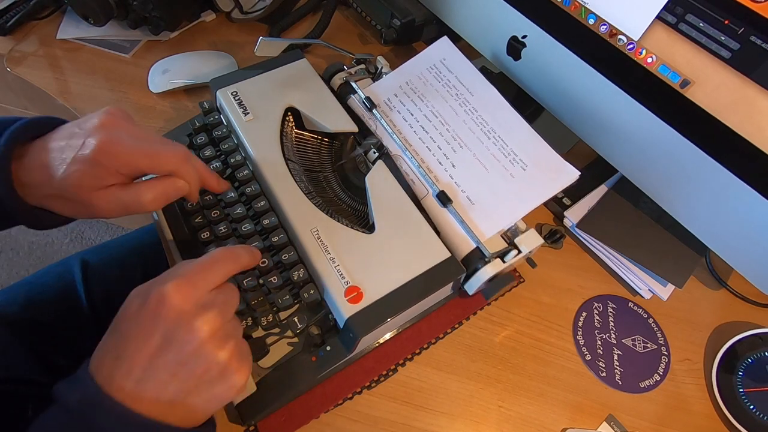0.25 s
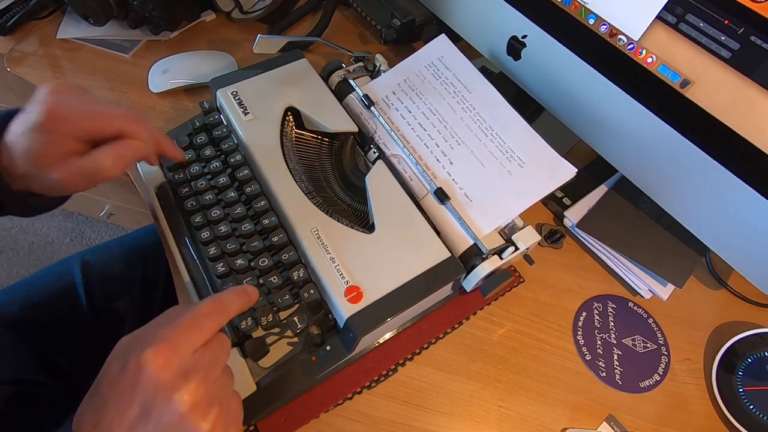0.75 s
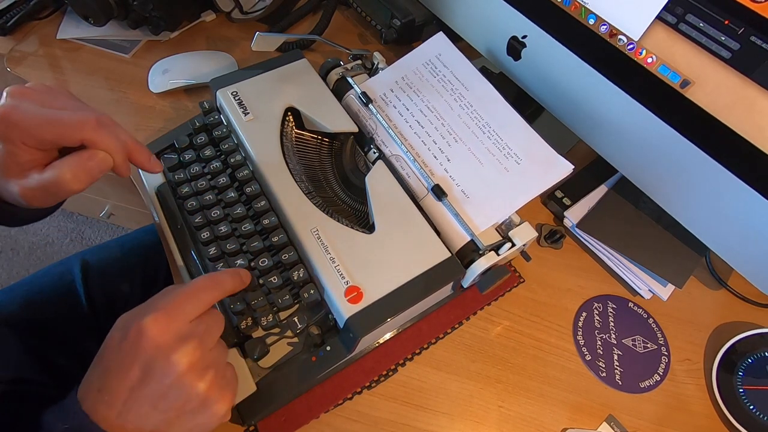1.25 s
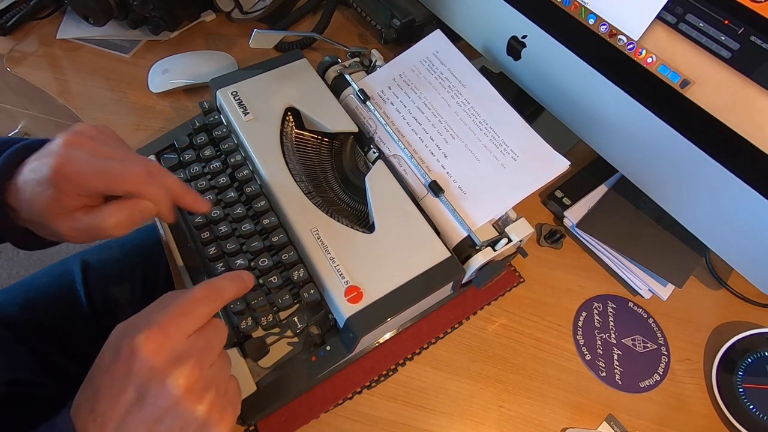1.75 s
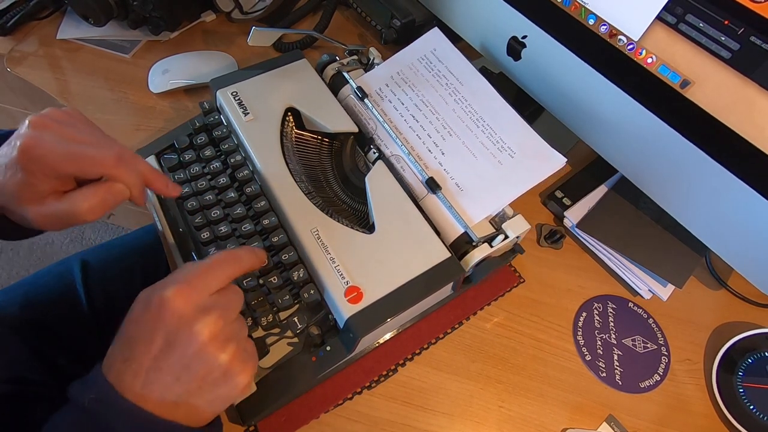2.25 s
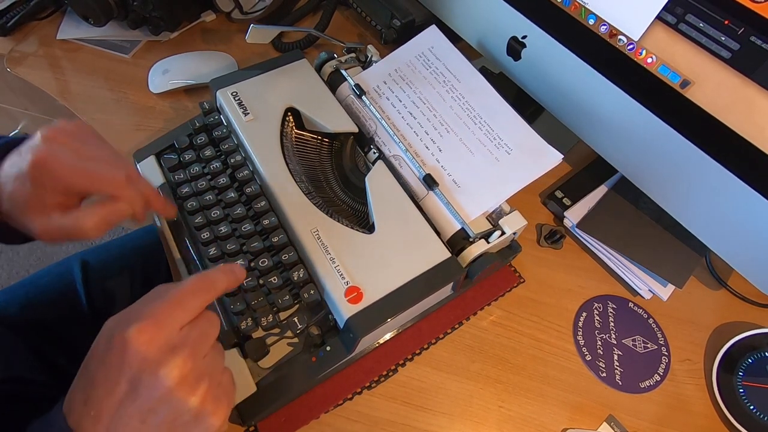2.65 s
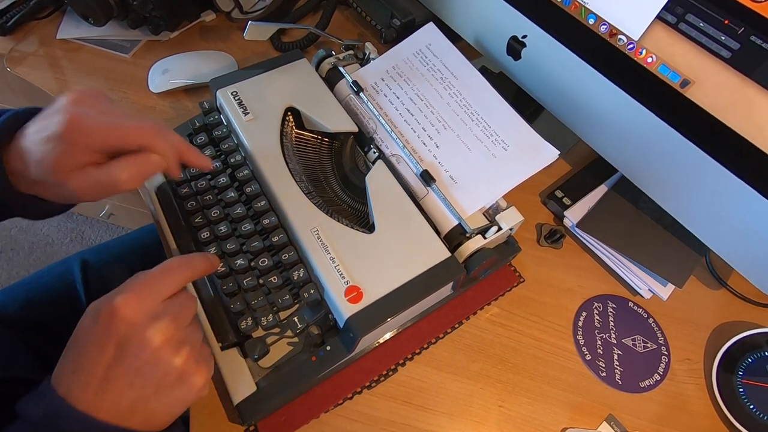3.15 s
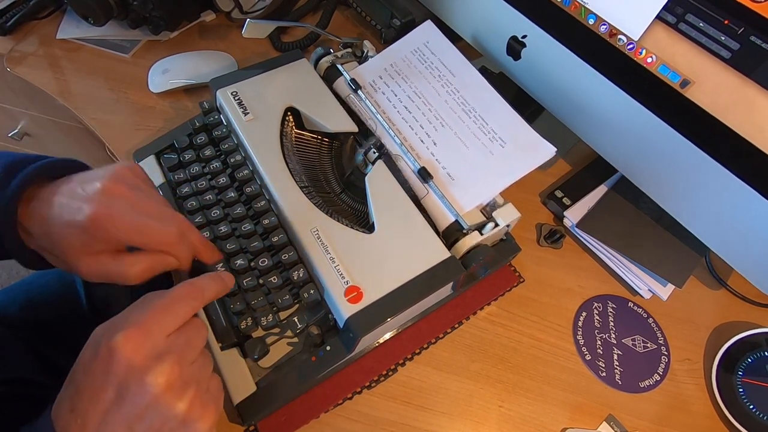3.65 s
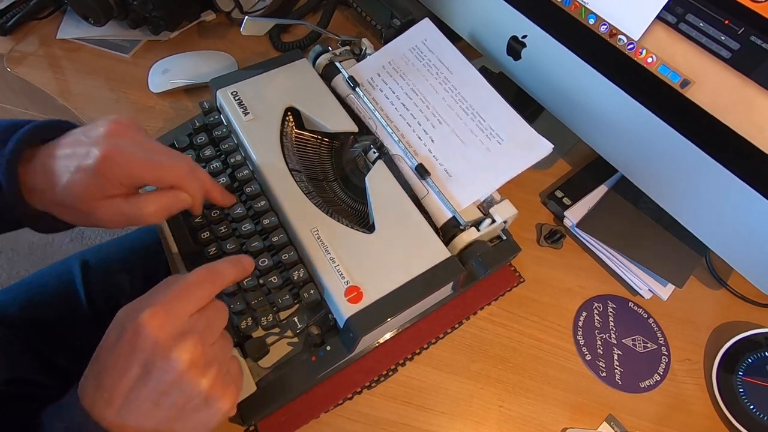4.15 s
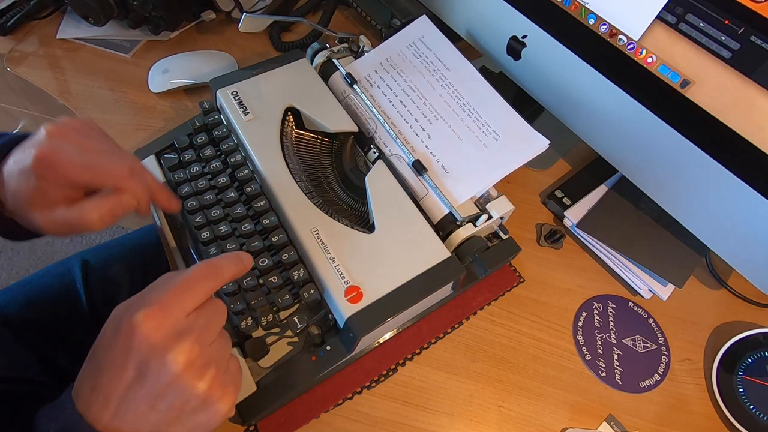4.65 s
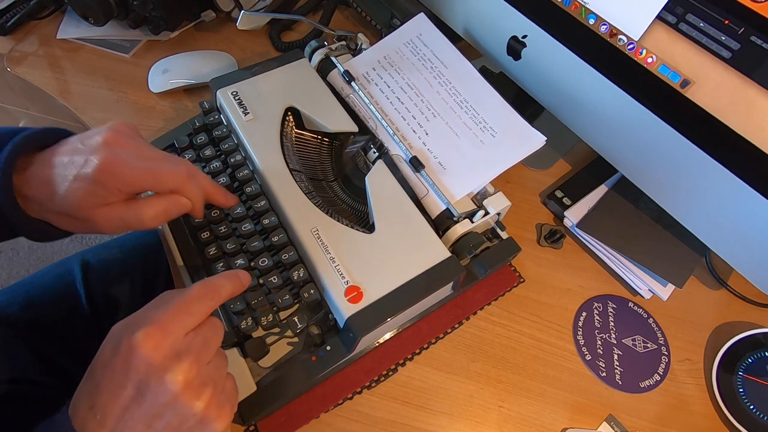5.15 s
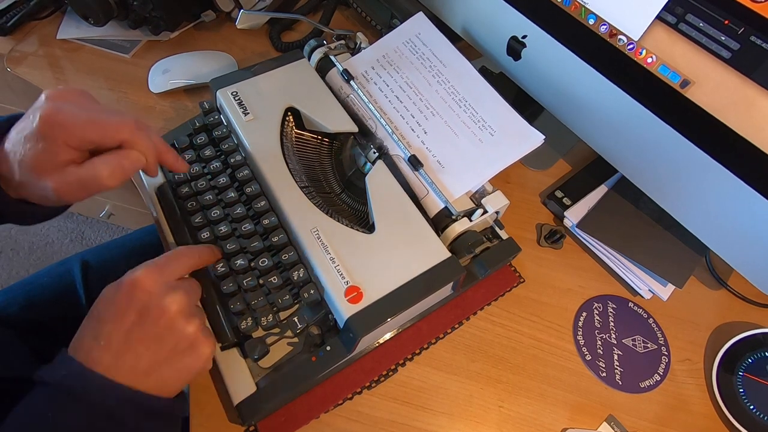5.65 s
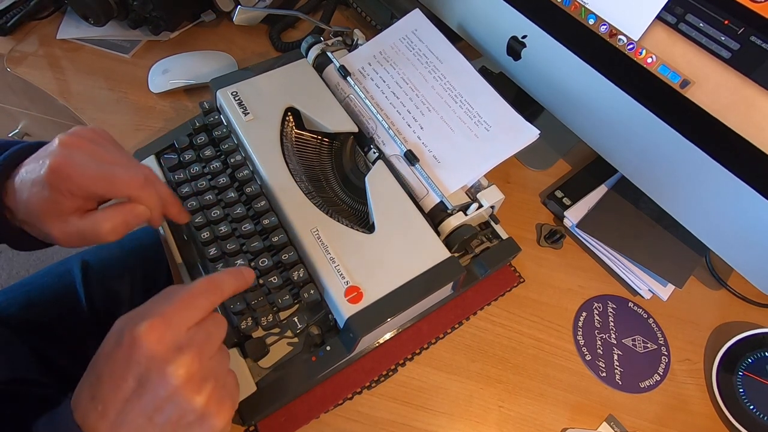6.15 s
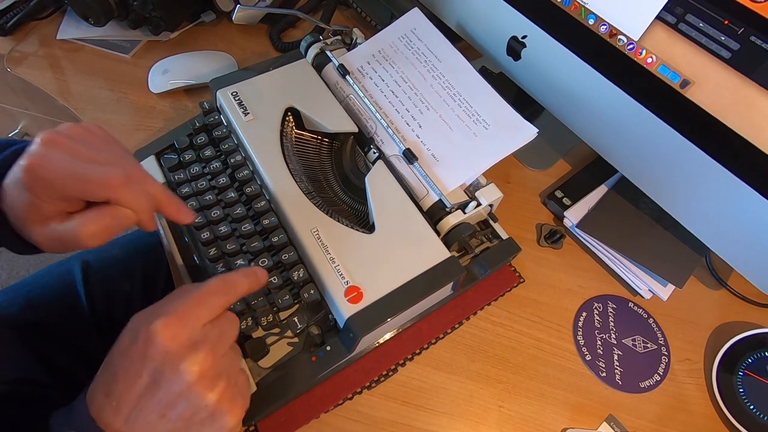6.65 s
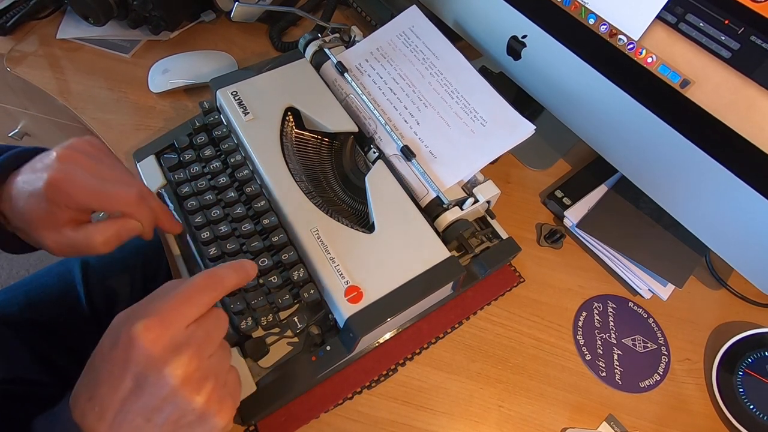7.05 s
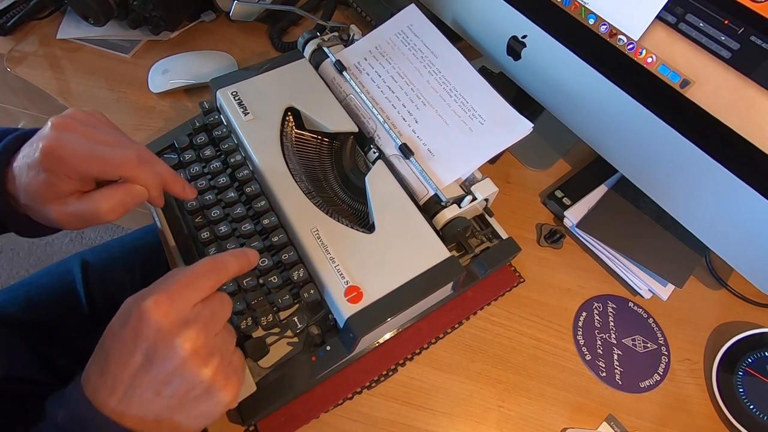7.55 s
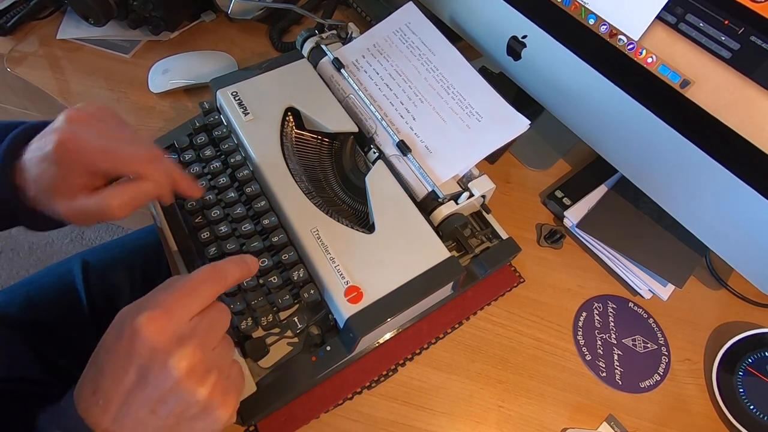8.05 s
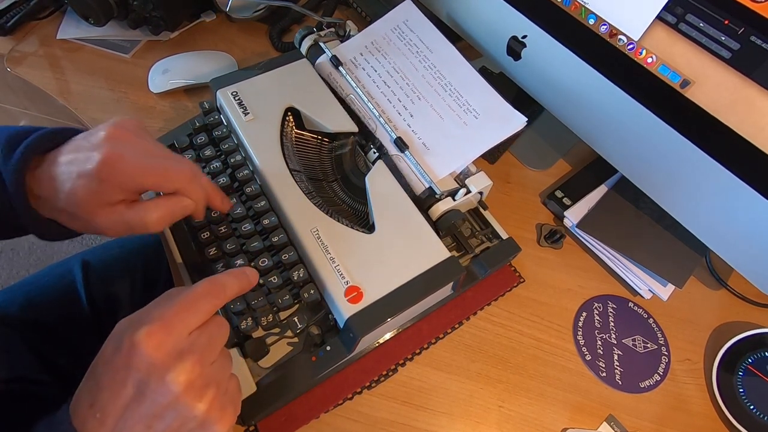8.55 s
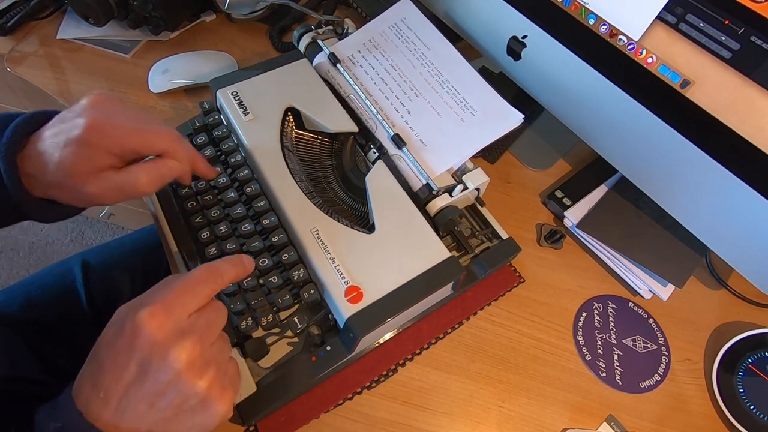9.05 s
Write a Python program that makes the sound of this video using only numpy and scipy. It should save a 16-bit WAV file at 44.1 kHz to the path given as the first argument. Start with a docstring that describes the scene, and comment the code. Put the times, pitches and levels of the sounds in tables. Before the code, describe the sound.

A portable manual typewriter is typed on with two fingers, close up and in stereo, in a small, quiet room with a faint low rumble. Each letter is a sharp clack of type against paper, wrapped in a quick linkage rattle, a carriage click and the typebar falling back. The steel frame rings briefly and the wooden desk thumps underneath. Three quick letters open, then the typing continues unevenly at about three or four strokes a second. Duller, hollow space bar thuds separate the runs at about 0.6, 1.7, 2.8, 4.0, 4.6, 6.1, 7.1 and 8.3 seconds. Key springs add thin, bright jangles now and then, clearest near 3.5, 6.0 and 7.6 seconds. Two letters around 6.5 and 6.9 seconds click with less slap, then firmer strikes return, with the last stroke at about 9.1 seconds.

```python
"""Over a faint room rumble, a key rattles and type slaps paper: two fingers on a portable manual typewriter,
close up and in stereo, on a wooden desk. For each letter the linkage rattles, the escapement trips,
the type slaps the platen, the carriage steps and the typebar falls back. The space bar thuds and steps
the carriage without a slap. Every stroke rings the steel frame and thumps the desk."""
import sys
import numpy as np
from scipy import signal
from scipy.fft import rfft, irfft
from scipy.io import wavfile

SR = 44100
rng = np.random.default_rng(int(sys.argv[2]) if len(sys.argv) > 2 else 0)


def digitize_waveform(pressure):
    """Quantize a signal to 16-bit integers and store it at the path in sys.argv[1].

    Rows of a 2-D input are taken as channels; values are limited to [-1, 1].
    """
    field = np.atleast_2d(pressure).T
    bounded = np.clip(field, -1, 1)
    quanta = np.round(bounded * 32767).astype(np.int16)
    wavfile.write(sys.argv[1], SR, quanta)


N = 409688
TIME = np.arange(N) / SR


def undb(db):
    """Decibels to gain."""
    return 10 ** (np.asarray(db) / 20)


def unit(x):
    """Scale a response to unit energy in each channel."""
    return x / np.sqrt(np.sum(x ** 2, axis=-1, keepdims=True))


def fade(t, t60):
    """Exponential decay, 60 dB down after t60 seconds."""
    return undb(-60 * t / t60)


def add(track, at, sound):
    """Mix a sound into a track at a time in seconds."""
    start = int(round(at * SR))
    a, b = max(start, 0), min(start + sound.shape[-1], N)
    if b > a:
        track[..., a:b] += sound[..., a - start:b - start]


def convolve(x, response):
    """Pass a track through an impulse response."""
    return signal.oaconvolve(np.atleast_2d(x), response, axes=-1)[:, :x.shape[-1]]


def colour(x, points, size=4096):
    """Minimum-phase EQ through (Hz, dB) points."""
    hz, db = np.transpose(points)
    bin_hz = np.arange(size // 2 + 1) * SR / size
    gain = undb(np.interp(np.log(bin_hz + 1), np.log(hz), db))
    cepstrum = irfft(np.log(gain))
    cepstrum[1:size // 2] *= 2
    cepstrum[size // 2 + 1:] = 0
    return convolve(x, irfft(np.exp(rfft(cepstrum)))[None])


def ears(mid_side, side_db, split_hz):
    """Left and right from mid and side: narrow in the bass, wide above split_hz."""
    mid, side = mid_side
    treble = signal.sosfilt(signal.butter(2, split_hz, "high", fs=SR, output="sos"), side)
    side = treble + undb(side_db) * np.roll(side - treble, SR // 1000)
    return np.array([mid + side, mid - side])


def stereo_noise(seconds, side_db, split_hz):
    """Broadband noise that widens above split_hz."""
    return ears(rng.standard_normal((2, int(seconds * SR))), side_db, split_hz)


# EQ of the quiet room. Each row: frequency in Hz, gain in dB.
ROOM_TONE_EQ = [(20, -19.5), (50, -8), (90, -2.5), (130, -5), (200, -28), (400, -28), (1000, -25.5),
                (3000, -33), (9000, -53), (11500, -75.5)]


def room_tone(db=-57):
    """A steady bed of low rumble with a trace of hiss."""
    air = colour(stereo_noise(N / SR + 1, -2.5, 3000)[:, :N], ROOM_TONE_EQ)
    return undb(db) * air / air.std()


def chatter(db, rise, t60, per_s=9000, spread_db=3):
    """A part lands and chatters: a mid/side swarm of tiny impacts that swells and dies away."""
    t = TIME[:int((rise + t60) * SR)]
    hits = rng.random(SR // 2)[:len(t)] < per_s / SR
    force = rng.standard_normal((2, SR // 2))[:, :len(t)]
    impacts = hits * np.sign(force) * undb(spread_db * np.abs(force))
    envelope = np.minimum(t / rise, 1) * fade(np.maximum(t - rise, 0), t60)
    return undb(db) * impacts / impacts.std() * envelope


def knock(impacts, body_eq):
    """Impacts heard through the colour of the part that they shake."""
    return colour(ears(impacts, -20.5, 1000), body_eq)


def ring(modes, db, detune=.03, scatter_db=3.0, contact_s=0.00072, lag_s=.000015, size=1100):
    """One blow rings a part's modes, never twice quite alike; the left ear hears it later."""
    t = np.maximum(TIME[:size] - np.array([[lag_s], [0]]), 0)
    tone = 0
    for hz, t60, mode_db in modes:
        pitch, force = rng.standard_normal(2)
        gain = undb(db + mode_db + scatter_db * force)
        tone = tone + gain * np.sin(2 * np.pi * hz * (1 + detune * pitch) * t) * fade(t, t60)
    return tone * (1 - np.exp(-t / contact_s))


# Letter cues. Each row: strike time in seconds, platen slap trim in dB, typebar landing trim in dB.
LETTER_CUES = [(.045, -0.5, -0.5), (0.2352, 3.5, 4), (.3383, 2.5, -2), (.926, 3.5, 6), (1.2298, -2, -14),
               (1.429, 0.5, -1), (1.9478, -0.5, -8.5), (2.211, 0.5, -12.5), (2.41, -0.5, -3),
               (2.5674, -0.5, 0.5), (3.089, -3, -4.5), (3.327, 1, -0.5), (3.7282, -2, -0.5),
               (4.2487, -4, -2), (4.439, -3, 0), (4.9394, -10, 6), (5.24, -3, 2.5), (5.5451, 0, 2),
               (5.76, -6.5, -4), (5.9081, -10.5, 2.5), (6.5053, -22, -5.5), (6.8675, -35, -34),
               (7.447, -4.5, -2.5), (7.7762, -9, -3.5), (8.0102, -1.5, -0.5), (8.613, -0.5, 5),
               (8.8139, -2.5, -8), (9.1023, -19, -3.5)]
# The typebar's click in its guide, then the slug's smack on paper and platen.
# Each row: pitch in Hz, 60 dB decay in seconds, level in dB.
GUIDE_MODES = [(2930, 0.00095, -2), (5040, 0.00095, 7), (6550, 0.0026, -2.5)]
PLATEN_MODES = [(906, 0.002, -15), (1700, 0.00082, -22), (2390, 0.0065, 4.5), (3004, 0.0067, 1)]
# EQs of the dull carriage knock and the bright key springs. Each row: frequency in Hz, gain in dB.
CARRIAGE_EQ = [(150, -10.5), (280, -2.5), (380, -17.5), (470, -4.5), (560, -11.5), (770, 1.5), (1000, -5.5),
               (1500, -4.5), (3000, -20.5), (9000, -47)]
KEY_SPRING_EQ = [(100, -60.5), (5000, -31), (7800, -6.5), (8900, 0.5), (9500, 1), (10500, -29)]
# Key springs that jangle loudly as a lever settles. Each row: start in seconds, level before EQ in dB.
JANGLE_CUES = [(1.06, -39), (2.064, -36), (3.219, -38.5), (3.455, -28), (5.08, -35.5), (5.364, -38),
               (6.039, -31), (7.571, -30.5), (8.747, -33)]


def letters(travel_s=.037, step_s=.034, fall_s=.094):
    """Each key throws a typebar at the platen; clash and thump grow as the carriage moves along."""
    steel, dull, springs, rings = np.zeros((4, 2, N))
    pushes = np.zeros(N)
    for at, slap_db, land_db in LETTER_CUES:
        steps = sum(cue[0] < at for cue in LETTER_CUES) + sum(press < at for press in SPACE_CUES)
        clash_db = -3.5 + 0.066 * steps
        thump_db = 0.67 + 0.0862 * steps
        touch = at - travel_s - .002 * rng.standard_normal()
        land = at + fall_s + .004 * rng.standard_normal()
        stop = at + step_s + 0.0014 * rng.standard_normal()
        # The finger lands, the lever ticks through its slack, the linkage swings the typebar up.
        add(pushes, touch, undb([-40 + thump_db]))
        add(steel, touch, chatter(-41, .001, 0.045, per_s=3000))
        add(steel, touch - .002, chatter(-31, 0.023, 0.14, per_s=3300, spread_db=-1))
        add(dull, at - .024, chatter(-29, 0.036, 0.061))
        # The escapement trips and the ribbon lifts.
        add(steel, at - .008, chatter(-15.5 + clash_db, 0.005, 0.022))
        # The typebar clashes in its guide, slaps the platen and rebounds.
        guide, platen = at - .00105, at - .00045
        add(steel, guide, chatter(-10.5 + clash_db, 0.000067, 0.029))
        add(rings, guide, ring(GUIDE_MODES, -.5 + clash_db, scatter_db=.8, lag_s=.00002))
        add(rings, platen, ring(PLATEN_MODES, -6.5 + slap_db, scatter_db=.8, lag_s=.000005))
        add(steel, at + 0.00086, chatter(-14 + clash_db, 0.00012, 0.036, per_s=4000))
        add(pushes, at, undb([-29 + thump_db]))
        # The carriage steps, stops and shakes the loose linkage.
        add(steel, stop - .002, chatter(-29, 0.0025, 0.064))
        add(steel, stop, chatter(-35.5, 0.022, 0.26, per_s=2200, spread_db=0))
        add(dull, stop, chatter(-27, .004, 0.34))
        add(pushes, at + .051, undb([-38 + thump_db]))
        # The typebar falls back on its rest.
        add(steel, land - .003, chatter(-38.5 + land_db, 0.011, 0.17, per_s=2400, spread_db=5.5))
        add(dull, land, chatter(-28 + land_db, 0.0011, 0.089))
        add(pushes, land, undb([-35 + thump_db]))
        # The key lever settles and its spring jangles.
        settle = land + 0.051 + 0.0088 * rng.standard_normal()
        add(steel, settle, chatter(-50.5, .002, 0.12))
        add(springs, settle, chatter(-44 + 2 * rng.standard_normal(), 0.0034, 0.094))
    for at, db in JANGLE_CUES:
        add(springs, at, chatter(db, 0.0049, 0.088))
    return steel, pushes, knock(dull, CARRIAGE_EQ) + knock(springs, KEY_SPRING_EQ) + rings


# EQ of small steel parts colliding. Each row: frequency in Hz, gain in dB.
STEEL_EQ = [(150, -23.5), (400, -25.5), (750, -2.5), (1050, -9), (1600, -0.5), (2300, 2.5), (3200, 3.5),
            (4500, 2.5), (8500, -1), (9600, -4.5), (11300, -19.5), (14500, -26), (16000, -35)]
# Ring of the steel frame and cover. Each row: pitch in Hz, 60 dB decay in seconds, relative level in dB.
FRAME_MODES = [(454.2, 0.46, -16), (613, 0.93, -18.5), (658, 0.31, -13), (794, 0.19, -10),
               (961, 0.26, -9.5), (1193, 0.5, -18), (1270, 0.05, -4), (1740, 0.15, -19.5),
               (1930, 0.12, -23.5), (2060, 0.25, -7.5), (2290, 0.14, -15.5), (3010, 0.18, -6.5),
               (3200, 0.073, -8.5), (5540, 0.045, -5), (6700, 0.022, -2), (8400, .3, -40),
               (8750, 0.21, -16.5)]


def frame(impacts, modes_db=-16, rattle_db=-7, rattle_t60=0.14):
    """Impacts click at once, ring the frame and set the basket of springs and typebars shivering."""
    t = TIME[:SR // 2]
    impacts = ears(impacts, -9, 8200)
    shiver = unit(stereo_noise(.5, -21.5, 5000) * fade(t, rattle_t60))
    body = sum(undb(db) * unit(np.cos(2 * np.pi * hz * t) * fade(t, t60)) for hz, t60, db in FRAME_MODES)
    clicks = colour(impacts, STEEL_EQ)
    rattle = undb(rattle_db) * convolve(clicks, shiver)
    ringing = undb(modes_db) * convolve(impacts, unit(body)[None])
    return clicks + rattle + ringing


# Low thump of the machine on its feet and the desk top.
# Each row: pitch in Hz, 60 dB decay in seconds, level in dB, pan (positive is left).
DESK_MODES = [(32.7, 0.74, -23, .1), (51.5, 0.19, -19, .15), (75.3, 0.39, -3, 0.2), (97.8, 0.16, 6, 0.11),
              (115.4, 0.17, -8.5, -0.36), (151.2, 0.11, -7, -.4), (232.8, 0.11, -14, 0),
              (283.5, 0.13, -17, 0)]
# EQ of the desk's boom in the room. Each row: frequency in Hz, gain in dB.
BOOM_EQ = [(25, -10.5), (60, 1), (95, 1.5), (130, -3.5), (200, -23), (280, -23.5), (420, -40), (1500, -82)]


def desk(pushes, boom_db=-9, boom_t60=0.6):
    """Downward pushes rock the machine on the desk; the boom lingers in the room."""
    t = TIME[:SR // 2]
    rocking = 0
    for hz, t60, db, pan in DESK_MODES:
        gains = undb(db) * np.array([[1 + pan], [1 - pan]])
        rocking = rocking - gains * np.sin(2 * np.pi * hz * t) * fade(t, t60)
    boom = colour(stereo_noise(.5, -5, 5000), BOOM_EQ)
    boom = unit(boom * (1 - np.exp(-t / 0.032)) * fade(t, boom_t60))
    boom *= undb(boom_db) * np.linalg.norm(rocking[0])
    thump = rocking * (1 - np.exp(-t / 0.01))
    return convolve(pushes, thump + boom)


# Space bar cues, all equally firm. Each entry: press time in seconds.
SPACE_CUES = [.611, 1.651, 2.795, 3.953, 4.6, 6.143, 7.065, 8.277]
# The escapement pawl's ping, then the hollow bar's knock on its stop.
# Each row: pitch in Hz, 60 dB decay in seconds, level in dB.
PAWL_MODES = [(3020, 0.046, 0), (3290, 0.011, -7.5)]
BAR_MODES = [(478, 0.016, -14), (773, 0.077, 4), (980, 0.072, -3.5), (1166, 0.036, -2.5)]
# EQs of the bar's thud and its spring's thin sizzle. Each row: frequency in Hz, gain in dB.
BAR_EQ = [(130, -28.5), (230, -2.5), (305, 11), (390, -31), (520, -5.5), (1200, -7), (9000, -75.5)]
BAR_SPRING_EQ = [(100, -60.5), (11500, -40.5), (12600, -8), (12950, 0.5), (13300, -7.5), (14200, -19.5)]


def space_bar(trim_db=1.33, stop_s=.032, return_s=.085):
    """The bar goes down and trips the escapement, the carriage steps, the bar springs back."""
    steel, dull, thud, springs, rings = np.zeros((5, 2, N))
    pushes = np.zeros(N)
    for at in SPACE_CUES:
        stop, back = at + stop_s, at + return_s
        # The finger meets the bar and the escapement trips.
        add(steel, at - .012, chatter(-38.5 + trim_db, .008, 0.077))
        add(steel, at - .001, chatter(-31 + trim_db, 0.0013, 0.18))
        add(rings, at, ring(PAWL_MODES, -32 + trim_db, detune=0.02, size=3000))
        # The bar bottoms out.
        add(dull, at + 0.00551, chatter(-27 + trim_db, 0.0044, 0.12))
        add(rings, at + .014, ring(BAR_MODES, -39 + trim_db, detune=.033, contact_s=.0013, size=3000))
        add(thud, at + .014, chatter(-24.5 + trim_db, 0.0098, 0.19))
        add(pushes, at + 0.01173, undb([-29 + trim_db]))
        # The carriage stops.
        add(steel, stop, chatter(-28 + trim_db, 0.0023, 0.044))
        add(pushes, stop + 0.0029, undb([-32.5 + trim_db]))
        # The bar springs back.
        add(steel, back - .006, chatter(-36 + trim_db, 0.021, 0.16, per_s=3300, spread_db=2))
        add(dull, back + 0.00448, chatter(-30 + trim_db, 0.0072, 0.24))
        add(rings, back + .0092, ring(BAR_MODES, -45 + trim_db, detune=.013, contact_s=.0017, size=3000))
        add(thud, back + .015, chatter(-26.5 + trim_db, 0.0089, 0.089))
        add(springs, back + .015, chatter(-43.5, 0.0037, .17))
        add(pushes, back + 0.044, undb([-35 + trim_db]))
    knocks = knock(dull, CARRIAGE_EQ) + knock(thud, BAR_EQ) + knock(springs, BAR_SPRING_EQ)
    return steel, pushes, knocks + rings


def room(x, wet_db=-17, t60=0.5, dull_hz=7000):
    """A small furnished room: a diffuse tail that starts after the first wall."""
    t = TIME[:SR // 2]
    onset = np.clip((t - .004) / 0.015, 0, 1)
    tail = unit(stereo_noise(.5, -14, 1500) * fade(t, t60) * onset)
    tail = signal.sosfilt(signal.butter(1, dull_hz, fs=SR, output="sos"), tail)
    return x + undb(wet_db) * convolve(x, tail)


def scene():
    """Letters and spaces work the same frame and desk."""
    steel, pushes, knocks = (a + b for a, b in zip(letters(), space_bar()))
    clatter = frame(steel) * undb([[-.5], [.5]])  # leans 1 dB to the right
    return room(clatter + knocks) + desk(pushes) + room_tone()


def record(dry, ceiling=0.74, top_hz=15600):
    """Master chain: drop the deepest rumble, round the sharpest peaks and cut the top."""
    tight = signal.sosfilt(signal.butter(1, 12, "high", fs=SR, output="sos"), dry)
    rounded = ceiling * np.tanh(tight / ceiling)
    return signal.sosfilt(signal.ellip(10, .2, 80, top_hz, fs=SR, output="sos"), rounded)


dry = scene()
out = record(dry)
digitize_waveform(out)
```